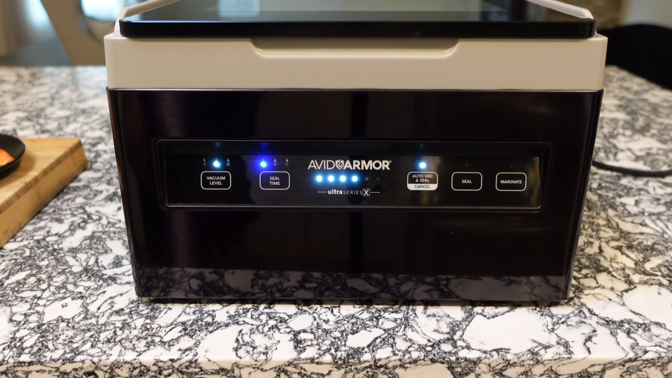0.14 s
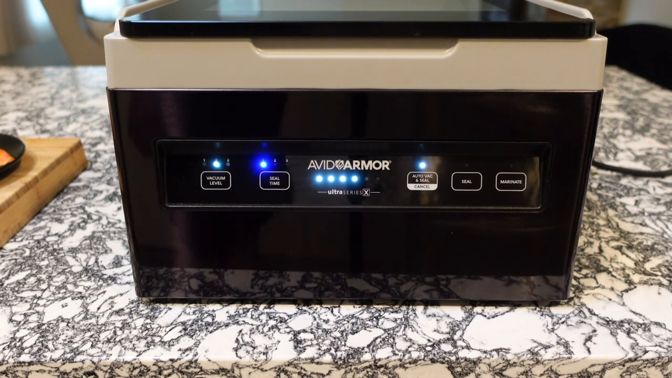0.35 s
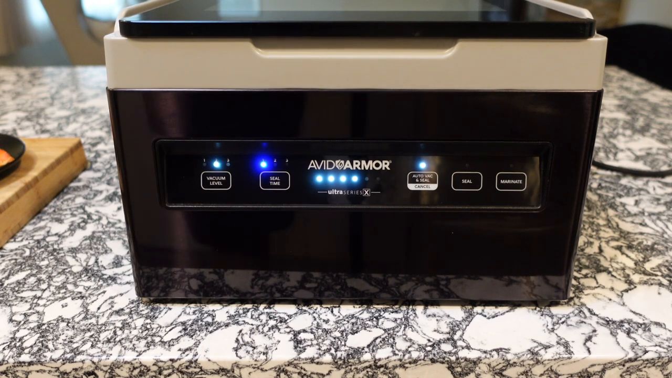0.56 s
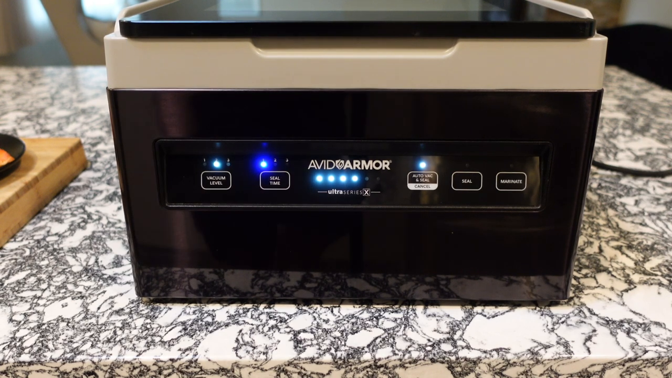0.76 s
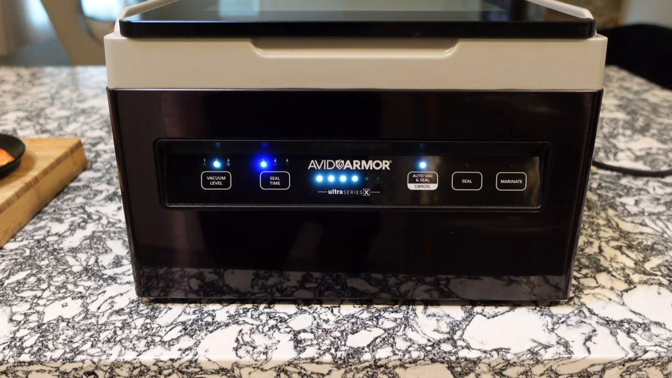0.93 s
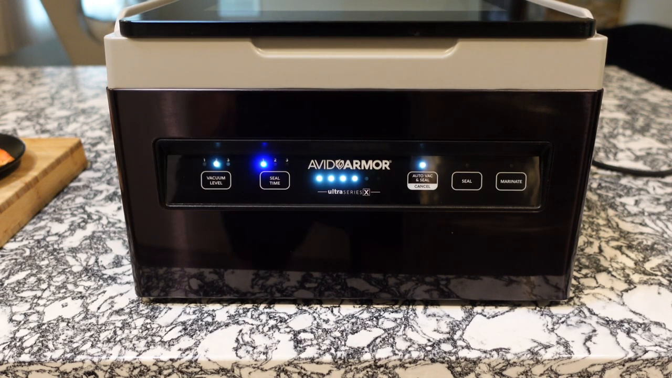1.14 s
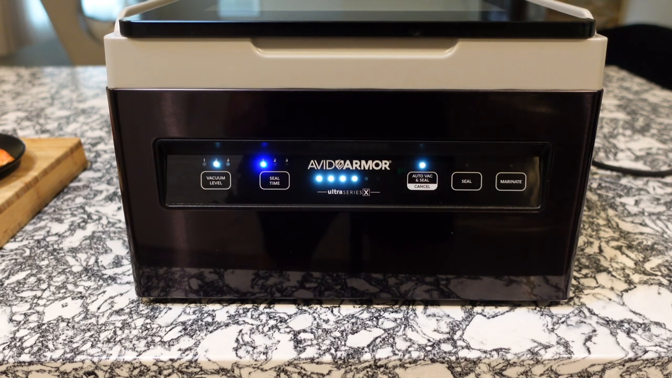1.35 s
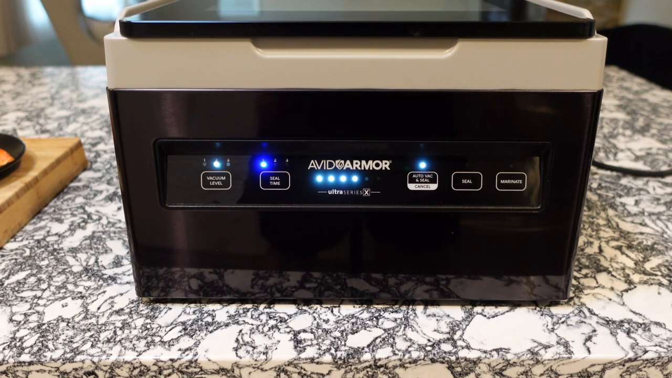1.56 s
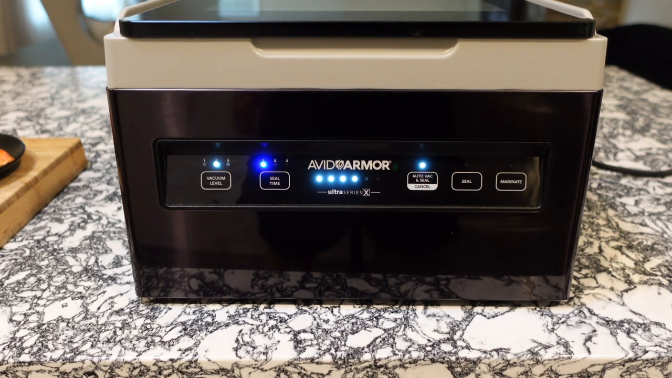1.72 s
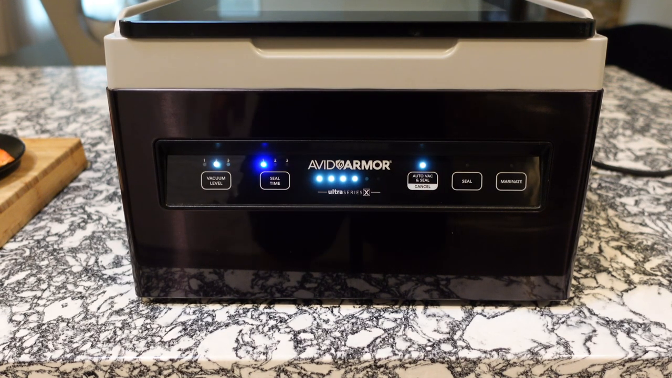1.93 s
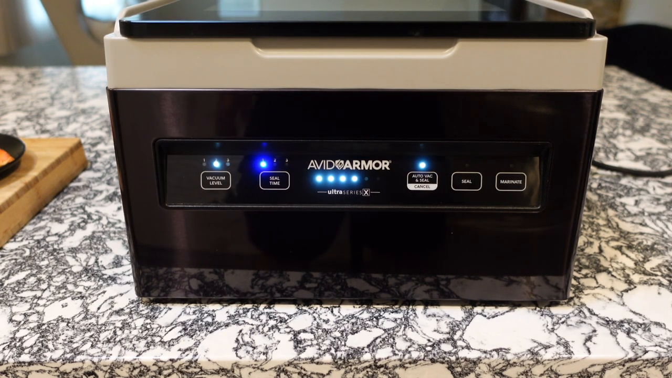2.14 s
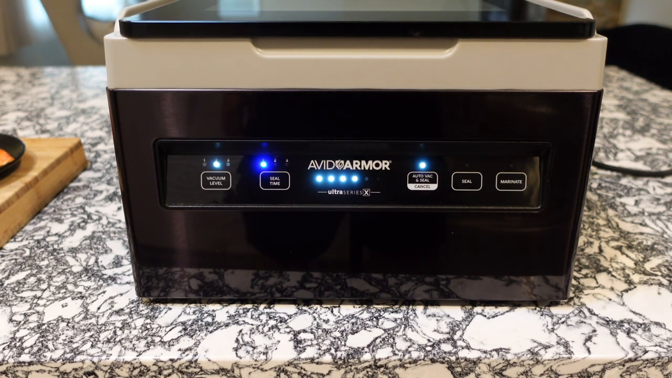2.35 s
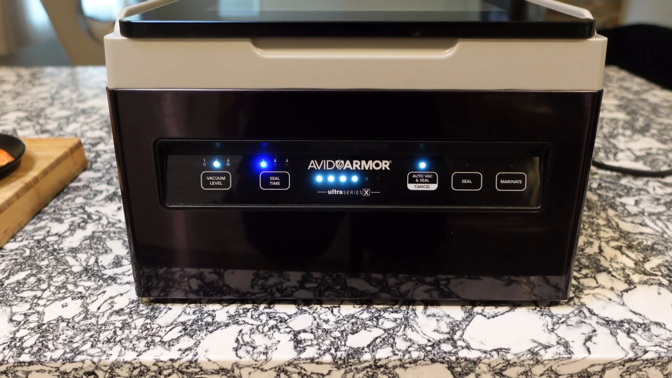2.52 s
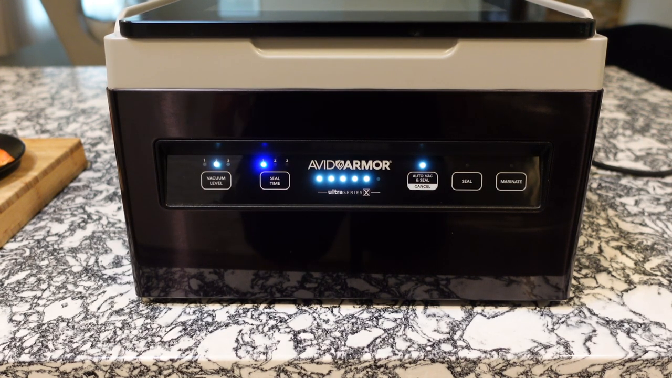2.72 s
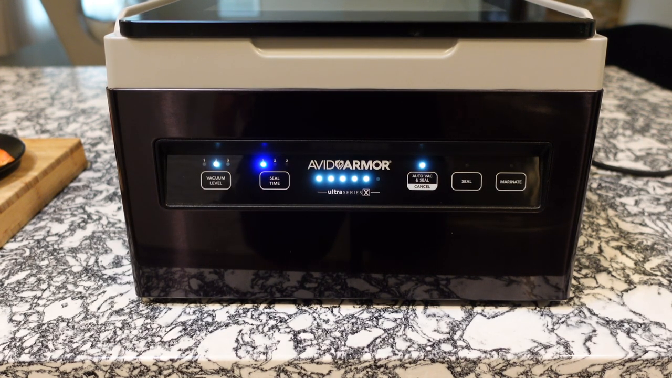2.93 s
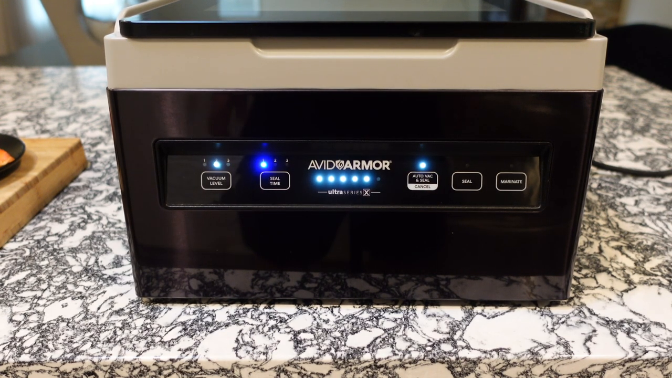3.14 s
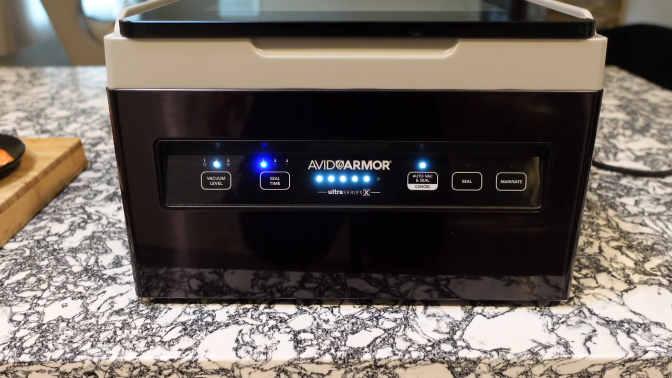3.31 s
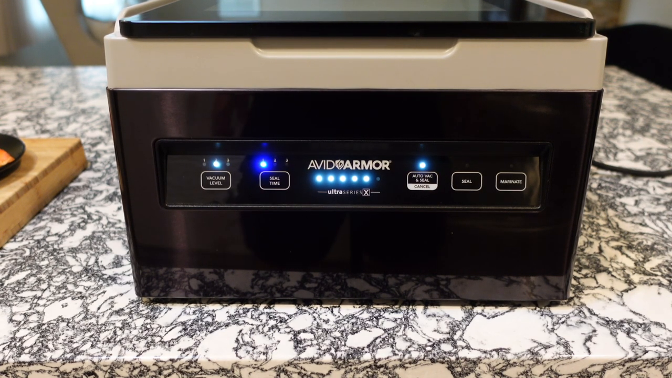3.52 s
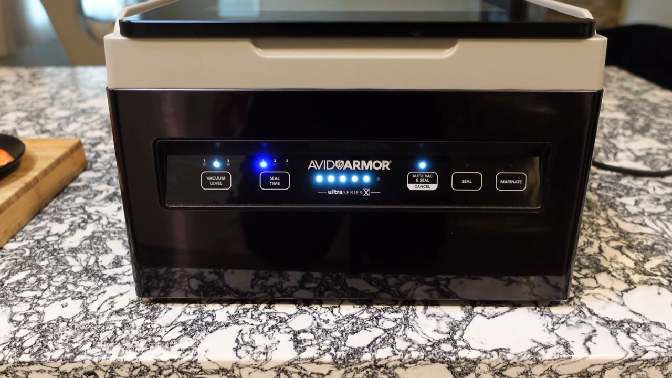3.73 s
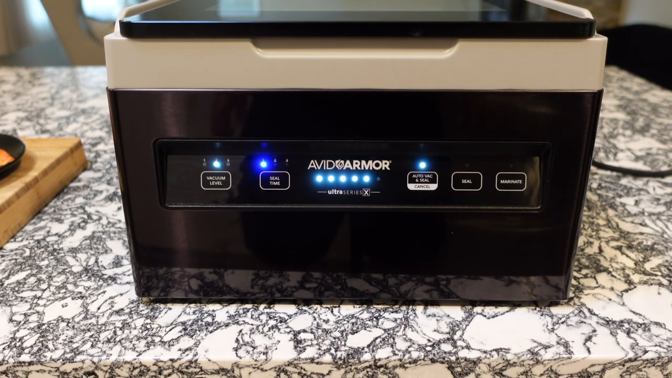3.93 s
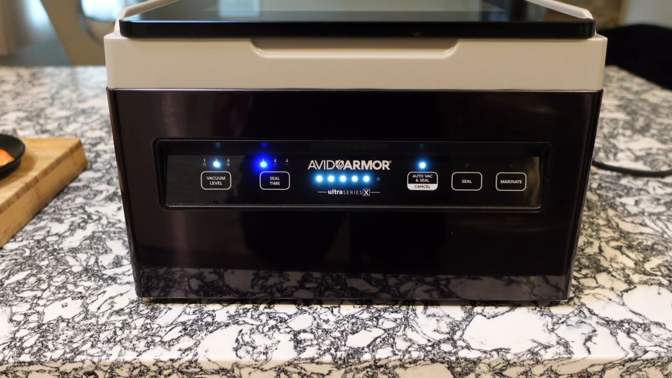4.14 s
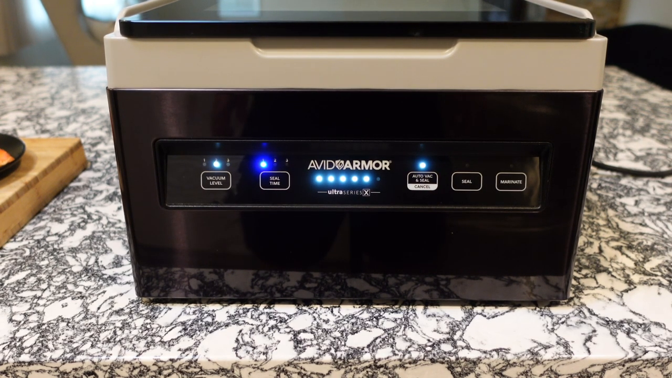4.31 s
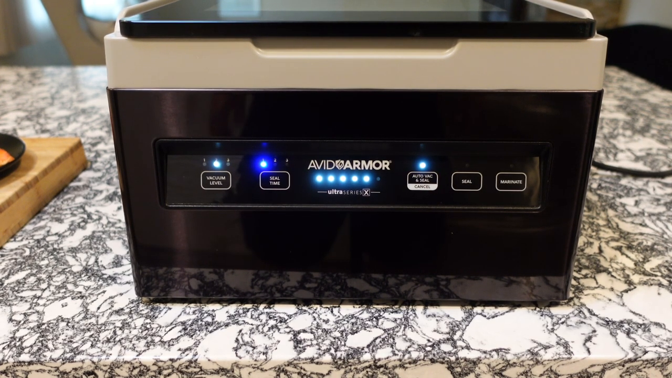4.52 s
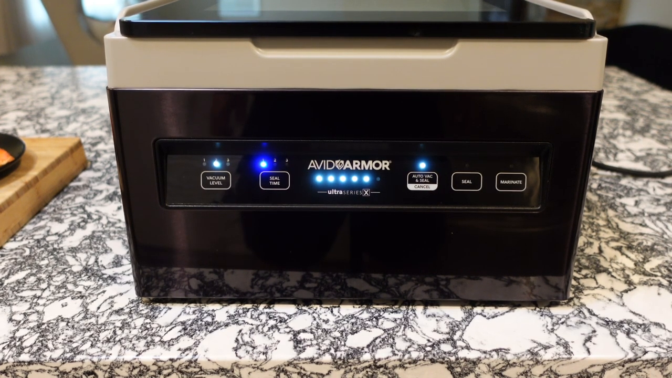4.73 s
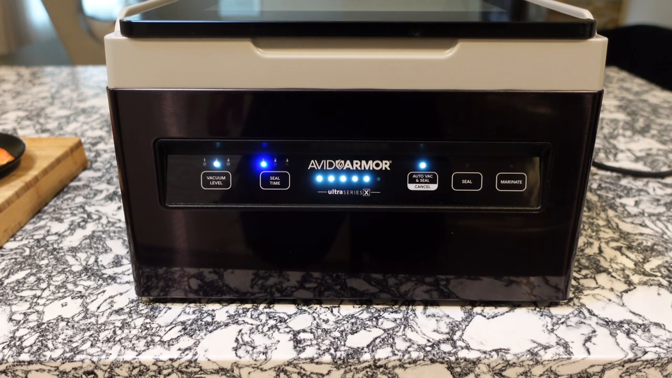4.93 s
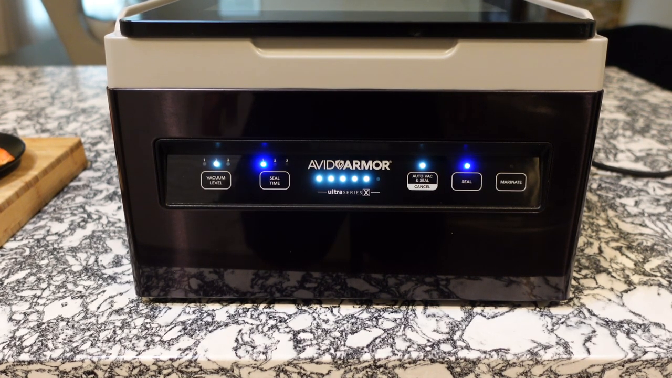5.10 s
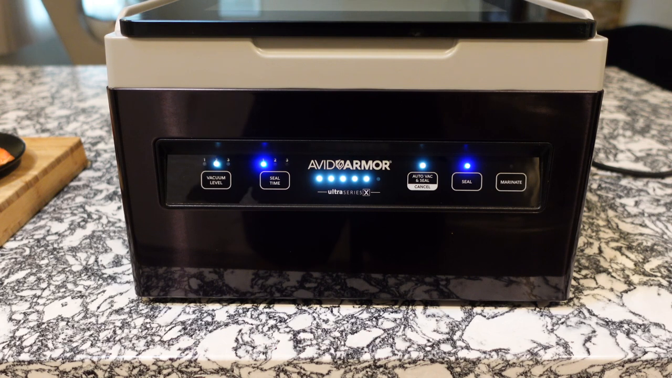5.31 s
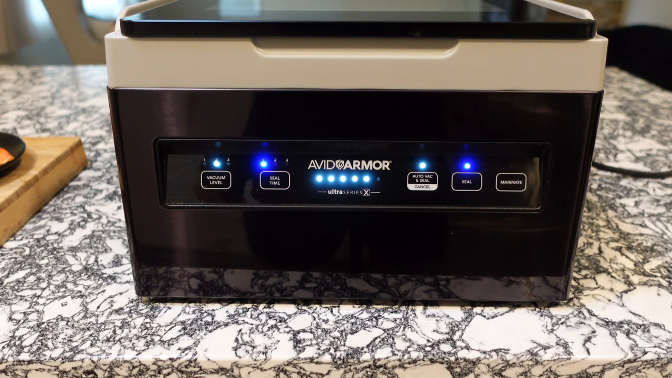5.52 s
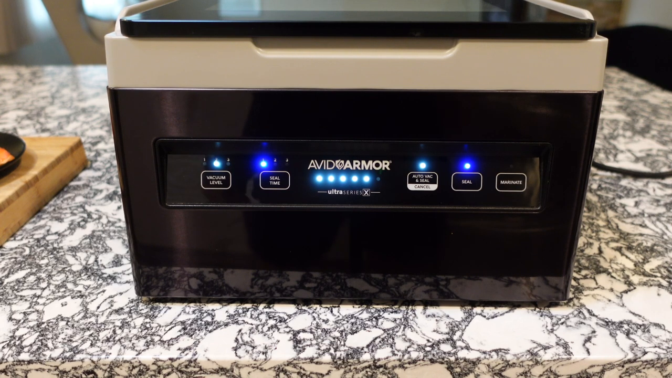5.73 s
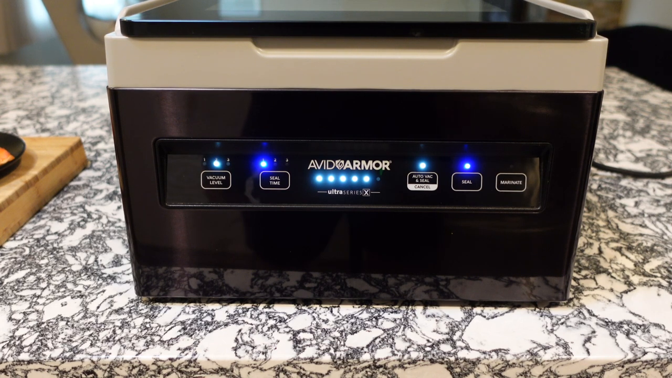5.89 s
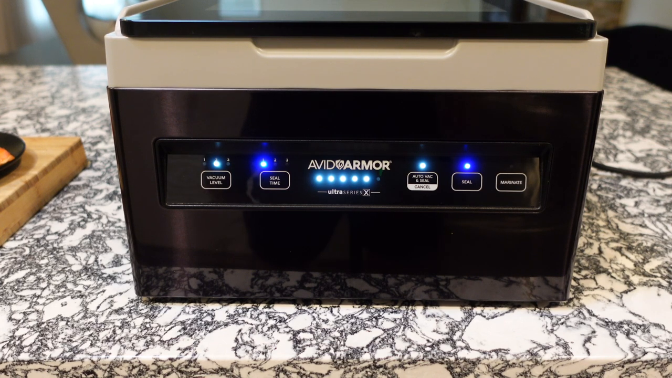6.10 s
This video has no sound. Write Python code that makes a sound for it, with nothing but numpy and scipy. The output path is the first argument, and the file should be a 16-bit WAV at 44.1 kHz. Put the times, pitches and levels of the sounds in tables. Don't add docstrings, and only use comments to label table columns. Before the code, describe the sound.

A countertop vacuum sealer runs close to the microphone in a hard-walled kitchen. Its piston pump throbs rapidly with low hum, metallic reed rattle and airy hiss, slowly speeding up. A small click comes early. Near the end a valve snaps with a puff of air, the pump sags slightly and stops dead, leaving a short echo, faint fan and mains hum, and tiny rustles.

```python
import sys
import numpy as np
from scipy import signal
from scipy.fft import rfft, irfft
from scipy.io import wavfile
from scipy.ndimage import uniform_filter1d

SR = 44100
rng = np.random.default_rng(int(sys.argv[2]) if len(sys.argv) > 2 else 0)


def persist_wave(psi):
    counts = np.round(np.clip(psi, -1, 1) * 32767).astype(np.int16)
    wavfile.write(sys.argv[1], SR, np.atleast_2d(counts).T)


def makeup_ratio(level_db):
    decades = np.asarray(level_db, float) / 20
    return 10 ** decades


N = 271656
T = np.arange(N) / SR

# (frequency [Hz], density [dB per Hz])
KITCHEN_TONE = [(25, -36), (50, -14), (80, -32), (140, -6), (210, 2.5), (680, -17), (940, 2), (1460, -17),
                (1600, -12), (3200, -19.5), (6400, -36.5), (14800, -37.5)]
# (frequency [Hz], width [Hz], level [dB])
FAN_MODES = [(103, 9, -50.5), (190, 23, -50.5), (518, 150, -42.5), (812, 30, -84), (940.5, 15, -47),
             (1466, 40, -45.5), (1790, 19, -53)]
# (time [s], half length [s], level [dB])
RUSTLES = [
    (5.313, .07, -58),
    (5.475, 0.077, -45.5),
    (5.68, 0.052, -50),
    (6.13, .02, -54),
]
# (frequency [Hz], density [dB per Hz])
RUSTLE_TONE = [(1500, -18), (4000, -1), (9000, -5), (12000, -11), (15000, -4)]
# (frequency [Hz], t60 [s])
ECHO_T60 = [(150, 0.12), (500, 0.23), (1200, 0.35), (2200, 0.97), (4000, 0.68), (9000, 0.18)]
# (level [dB], modes as (frequency [Hz], width [Hz], level [dB]))
SEAL_TICK = (-13, [(3100, 450, 0), (7000, 800, -7), (11000, 800, -10), (15000, 900, -20)])
# (frequency [Hz], density [dB per Hz])
PUFF_COLOUR = [(700, -19), (1120, 3), (2600, 2), (4000, -4), (6000, -12), (8000, -7), (10000, -12),
               (12400, 0), (15500, -7)]
# (frequency [Hz], density [dB per Hz])
HISS_TONE = [(40, -34), (100, -34), (200, -3), (330, -3.5), (600, -19.5), (1000, -11.5), (1700, -11),
             (2300, -11.5), (2900, -20.5), (4500, -26), (9000, -29), (10000, -32.5), (12000, -29.5),
             (15500, -27)]
# (frequency [Hz], width [Hz], level [dB])
METAL_PARTS = [
    [(957, 68, -8), (804, 320, -3.5)],
    [(1154, 37, 0.5), (1318.4, 35, 1.5), (1493.6, 45, 5), (6180, 160, -20.5), (6895, 87, -19)],
    [(2003, 37.4, 6.5), (2040, 8.9, -3.5), (2770, 87, -16), (3541, 54, -8.5), (3598, 56, -9.5),
     (8870, 370, -18)],
    [(2145, 43, 7.5), (2178.4, 46, 7), (2474, 79, -10.5)],
]
# (settled level [dB], offset at first [dB], swing with the hunting [dB], lag [turns])
RATTLE_LEVELS = [
    (-49.5, 15, 2.5, 0),
    (-32, -4.5, 0, 0.039),
    (-32, -18.5, 9, 0.25),
    (-31, -3.5, 1.5, 0.51),
]
RATTLE_SETTLES = [3.7, 1.3, 0.62, 4.6]
# (time [s], half length [s], boost [dB], part 0-3)
BUZZES = [
    (0, .1, 4, 0),
    (.87, .05, 4, 3),
    (1.16, .09, 5, 3),
    (5.14, .03, 15, 0),
]
# (shaft order, level [dB], slope [dB per Hz], bend [dB per Hz squared])
HUM_ORDERS = [(1, -55, -1, 2), (2, -42, 0, -3), (3, -44, -6, -3), (4, -29, 1, -1), (5, -22, 1, 0),
              (6, -24, 8, 1), (7, -36, 5, 15), (8, -28, -6, -5), (9, -21, -7, -9), (10, -41, 2, 11),
              (11, -37, 9, -4), (12, -40, -14, -20), (13, -33, 3, -15), (14, -37, 2, -3), (15, -45, 7, 3),
              (16, -43, 2, -1), (17, -50, 6, -1), (18, -40, 2, -18), (19, -41, 6, -3), (20, -47, 3, 2),
              (21, -50, 4, 11), (22, -46, -5, -6), (23, -48, 5, 4), (24, -46, 6, -4), (25, -49, 6, -4),
              (26, -51, 4, 5), (27, -42, -6, 3), (28, -47, -4, 10)]
# (frequency [Hz], level [dB])
PARTNER_LINES = [(40, -80), (100, -57), (250, -44), (400, -47), (550, -50), (1000, -56)]
# (frequency [Hz], width [Hz], boost [dB])
SIDE_PANEL = (486, 2.0, 12)

TICK_S, VALVE_S, SAG_S, STOP_S = .4705, 4.6336, 4.7, 5.145
USUAL_HZ, START_TURN = 35.4, .207
SHAKE_HZ = 66.658
RATTLE_FADE_DB_PER_S = 201


def evened(x):
    return x / np.sqrt(np.mean(x ** 2) + 1e-20)


def read(points, hz):
    f, value = np.transpose(points)
    return np.interp(np.log(hz + 1), np.log(f + 1), value)


def noise(points):
    white = rfft(rng.standard_normal(N))
    colour = makeup_ratio(read(points, np.fft.rfftfreq(N, 1 / SR)))
    return evened(irfft(white * colour, N))


def slow(hz):
    return np.interp(T * hz, np.arange(400), rng.standard_normal(400))


def ramp(start_s, takes_s):
    return np.clip((T - start_s) / takes_s, 0, 1)


def swell(s, half_s):
    return np.exp(-((T - s) / half_s) ** 4)


def ring(x, hz, width):
    r = np.exp(-np.pi * width / SR)
    return evened(signal.lfilter([1, 0, -1], [1, -2 * r * np.cos(2 * np.pi * hz / SR), r * r], x))


def kitchen():
    wash = makeup_ratio(-37.5) * noise(KITCHEN_TONE)
    fan = sum(makeup_ratio(db) * ring(rng.standard_normal(N), hz, width) for hz, width, db in FAN_MODES)
    mains = np.sqrt(2) * makeup_ratio(-47.5 + .8 * slow(8)) * np.sin(2 * np.pi * 57 * T)
    moves = makeup_ratio(-65) + sum(makeup_ratio(db) * swell(s, half_s) for s, half_s, db in RUSTLES)
    return wash + fan + mains + makeup_ratio(-5.5) * moves * noise(RUSTLE_TONE)


def echo(x):
    count = (SR - 301) // 20
    taps = np.zeros(SR)
    at = np.arange(300, SR - 20, 20) + rng.integers(0, 20, count)
    taps[at] = rng.choice([-1., 1.], count)
    hz, t, z = signal.stft(taps, SR, nperseg=512)
    decay = makeup_ratio(-60 * t / read(ECHO_T60, hz)[:, None])
    tail = signal.istft(z * decay, SR, nperseg=512)[1]
    return signal.fftconvolve(x, tail / np.linalg.norm(tail))[:N]


def tick():
    level_db, modes = SEAL_TICK
    t = np.maximum(T - TICK_S, 0)
    click = sum(makeup_ratio(db) * np.sin(2 * np.pi * hz * t) * np.exp(-np.pi * width * t) for hz, width, db in modes)
    return makeup_ratio(level_db) * click


def valve():
    t = np.maximum(T - VALVE_S, 0)
    snap = makeup_ratio(-17.5) * np.exp(-t / .012)
    puff = makeup_ratio(-29.5 - 130 * t) * (1 - ramp(VALVE_S + .12, .04))
    return ramp(VALVE_S, .001) * (snap + puff) * noise(PUFF_COLOUR)


def hiss(turns):
    air = noise(HISS_TONE)
    top = signal.sosfilt(signal.butter(2, 9000, "high", fs=SR, output="sos"), air)
    dull_db = -5 * (2.5 - ramp(1.1, .4))
    air = air + (makeup_ratio(dull_db) - 1) * top
    stroke = np.exp(-((turns + 0.19) % 1) / .08)
    return makeup_ratio(-33.5) * evened(air * (1 + .41 * stroke))


def rattle(turns, beat):
    slap, uneven_db, jitter_s, chatter, tail_turns = 3.2, 1, .00003, .6, .4
    return_turn, return_db = .72, -6
    at = np.flatnonzero(np.diff(np.floor(turns + .11)))
    draw = rng.standard_normal((len(at), 2))
    late = (draw[:, 0] * jitter_s * SR).astype(int)
    blows = np.zeros(N)
    blows[np.clip(at + late, 0, N - 1)] = makeup_ratio(uneven_db * draw[:, 1])
    shake = (chatter + np.exp(-((turns + 0.09) % 1) / tail_turns)) * rng.standard_normal(N)
    once = slap * evened(blows) + evened(shake)
    back = np.roll(evened(blows), round(return_turn * SR / USUAL_HZ))
    twice = once + makeup_ratio(return_db) * slap * back

    parts = [sum(makeup_ratio(db) * ring(ring(hit, hz, width), hz, 2 * width) for hz, width, db in modes)
             for hit, modes in zip([once, once, twice, twice], METAL_PARTS)]
    levels = []
    for (db, first_db, swing_db, lag), settle_s in zip(RATTLE_LEVELS, RATTLE_SETTLES):
        unsettled_db = first_db + swing_db * np.cos(beat - 2 * np.pi * lag)
        levels.append(db + unsettled_db * np.exp(-T / settle_s))
    for s, half_s, boost_db, part in BUZZES:
        levels[part] = levels[part] + boost_db * swell(s, half_s)
    return sum(makeup_ratio(db) * evened(part) for db, part in zip(levels, parts))


def timing(k, smear):
    lean, bass_lead, bass_step = 2.1, .9, 2.6
    if k <= 4:
        return lean + bass_lead + bass_step * (k - 4) + smear
    if k <= 9:
        return lean + smear * ((k - 6.5) ** 2 / 2 - 1.9)
    return rng.uniform(0, 2 * np.pi)


def hum(turns, speed, swing, beat, smear, coast):
    off_hz = speed + .55 * swing - USUAL_HZ
    panel_hz, width_hz, panel_db = SIDE_PANEL
    out = np.zeros((2, N))
    for k, db, slope_db, bend_db in HUM_ORDERS:
        row = int(k > 12)
        phase = timing(k, smear) + (.05 * k / 10 + coast) * slow(14)
        level_db = db + slope_db * off_hz + bend_db * off_hz ** 2 + .25 * k / 5 * slow(4.81)
        level_db += panel_db / (1 + ((k * speed - panel_hz) / width_hz) ** 2)
        out[row] += np.sqrt(2) * makeup_ratio(level_db) * np.cos(2 * np.pi * k * turns + phase)
        partner = 2 * np.pi * (k * turns + rng.random()) + phase + (-1) ** k * beat
        out[row] += np.sqrt(2) * makeup_ratio(read(PARTNER_LINES, k * USUAL_HZ)) * np.cos(partner)
    return out


def shaft():
    start_hz, climb_hz_per_s, ease_hz_per_s2 = 34.5877, .34679, .008634
    sag_hz, sag_takes_s, hunt_hz, stray_turns = .71, .08, .23, .002
    t = np.minimum(T, SAG_S)
    speed = start_hz + climb_hz_per_s * t - ease_hz_per_s2 * t ** 2
    speed = speed - sag_hz * ramp(SAG_S, sag_takes_s)
    even = np.cumsum(speed) / SR
    beat = 2 * np.pi * (2 * even - SHAKE_HZ * T)
    hunt = hunt_hz / (2 * np.pi * (2 * speed - SHAKE_HZ)) * np.cos(beat)
    stray = stray_turns * uniform_filter1d(slow(6), size=4000)
    return speed, START_TURN + even + hunt + stray, beat, -hunt_hz * np.sin(beat)


def pump():
    speed, turns, beat, swing = shaft()
    smear = 1.27 * np.exp(-(T / .71) ** 2)
    coast = .15 + 4.5 * ramp(STOP_S, .04)
    thump, upper = hum(turns, speed, swing, beat, smear, coast)
    shake_phase = 2 * np.pi * (SHAKE_HZ * T + 2 * START_TURN) + timing(1.98, 0)
    shake = np.sqrt(2) * makeup_ratio(-50) * np.cos(shake_phase)

    after = np.maximum(T - STOP_S, 0)
    metal_fade = makeup_ratio(-RATTLE_FADE_DB_PER_S * after)
    works = metal_fade * rattle(turns, beat) + makeup_ratio(-298 * after) * hiss(turns)
    return makeup_ratio(-158 * after) * (thump + shake), makeup_ratio(1.5) * metal_fade * upper, works


def scene():
    thump, upper, works = pump()
    works = works + valve() + tick()
    walls = echo(makeup_ratio(-9) * upper + makeup_ratio(-10) * works)
    return (thump + upper + works + walls + kitchen())[None]


def roll_off(x):
    return signal.sosfilt(signal.butter(12, 16490, fs=SR, output="sos"), x)


def record(dry):
    lowpass = signal.firwin(801, 15720, window=("kaiser", 1.5), fs=SR)
    limited = signal.oaconvolve(dry, lowpass[None], "same")
    return roll_off(limited)


dry = scene()
out = record(dry)
persist_wave(out)
```